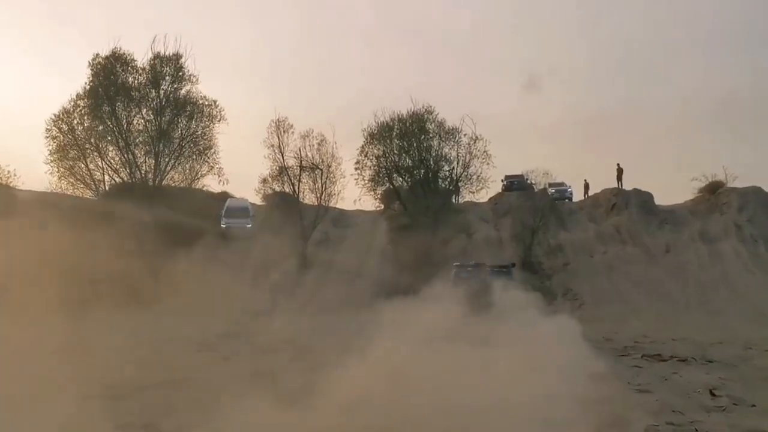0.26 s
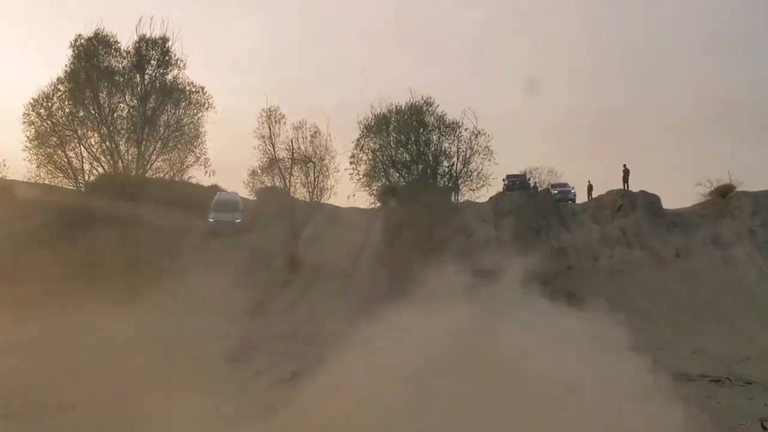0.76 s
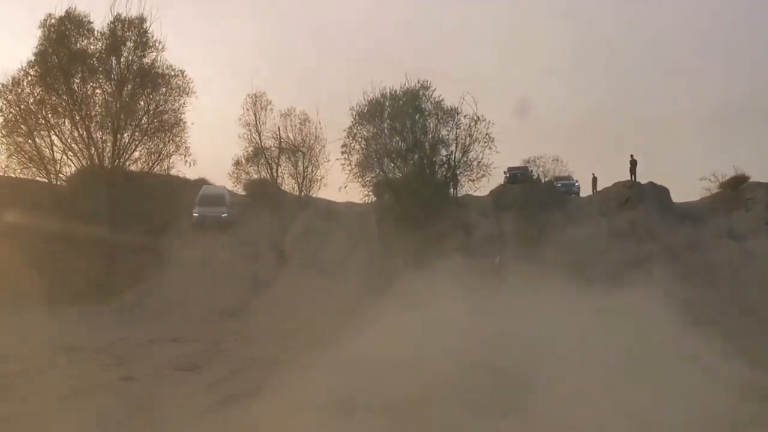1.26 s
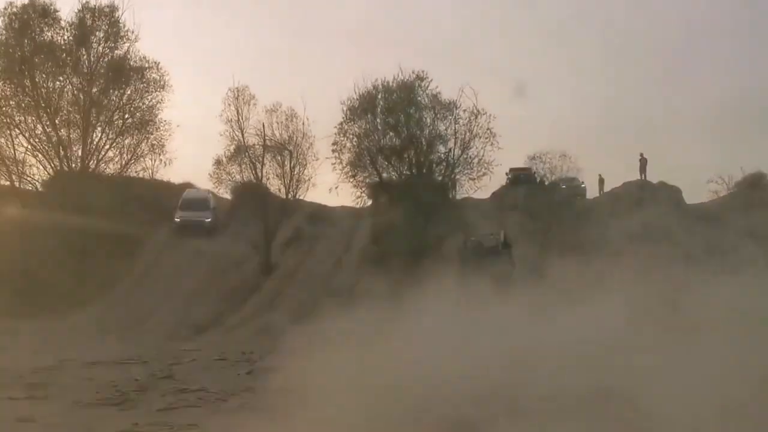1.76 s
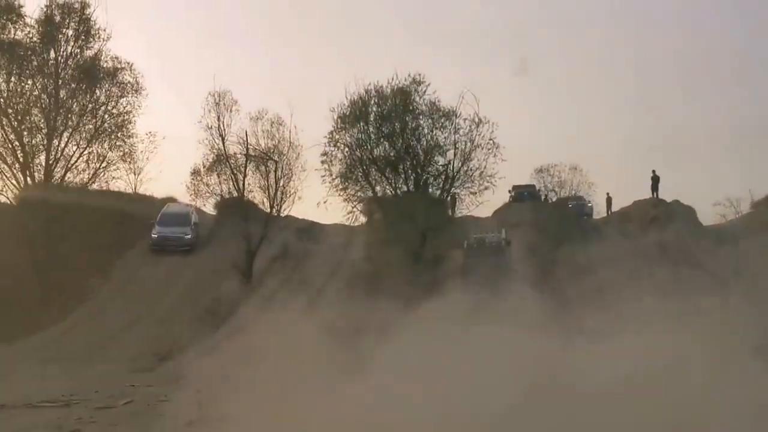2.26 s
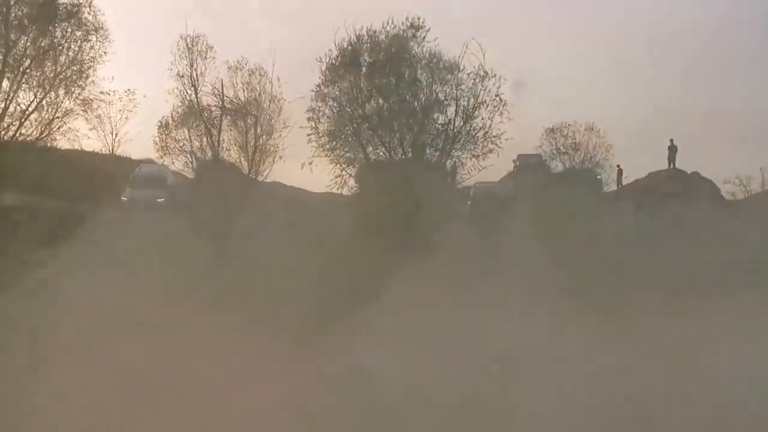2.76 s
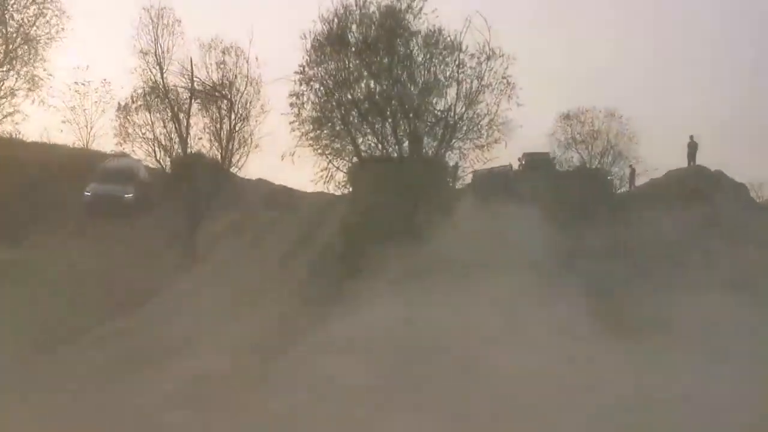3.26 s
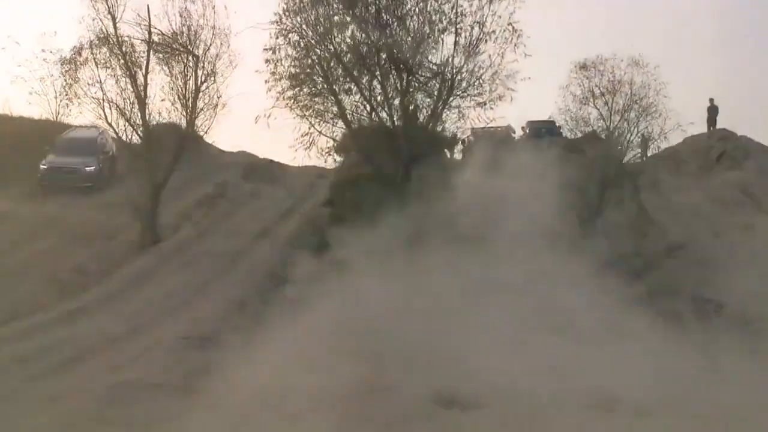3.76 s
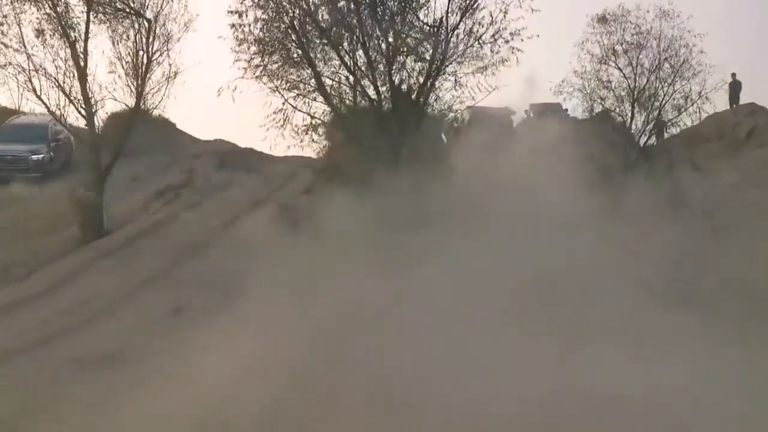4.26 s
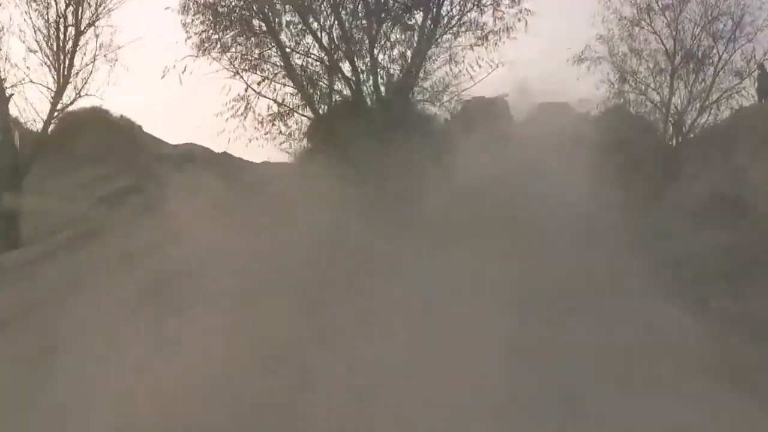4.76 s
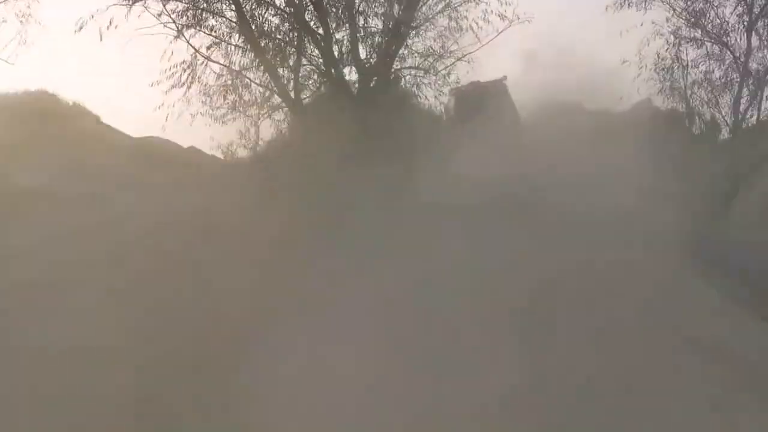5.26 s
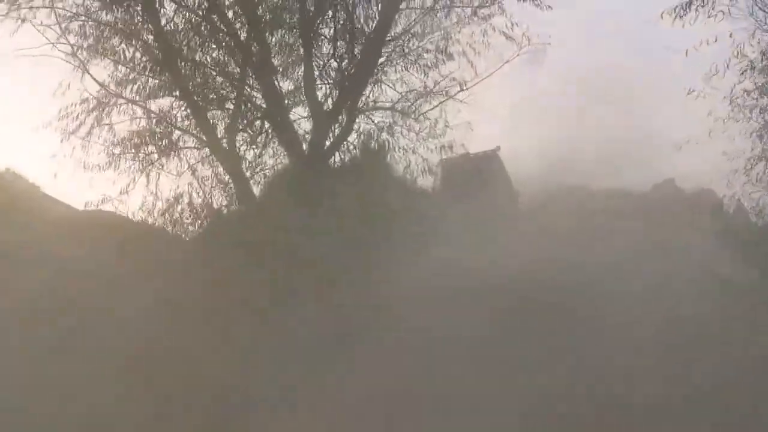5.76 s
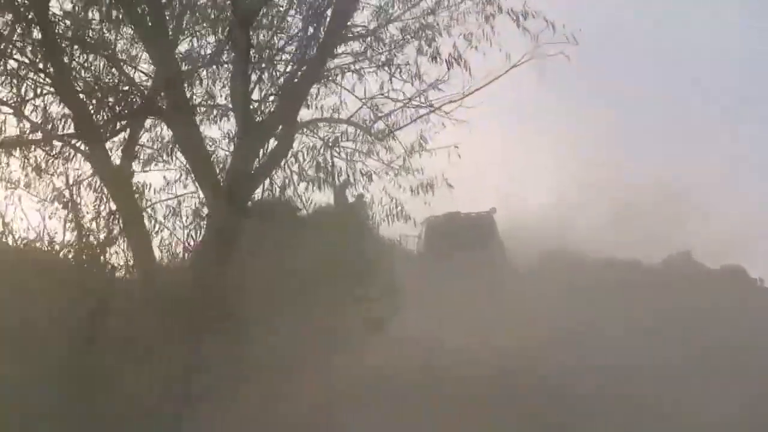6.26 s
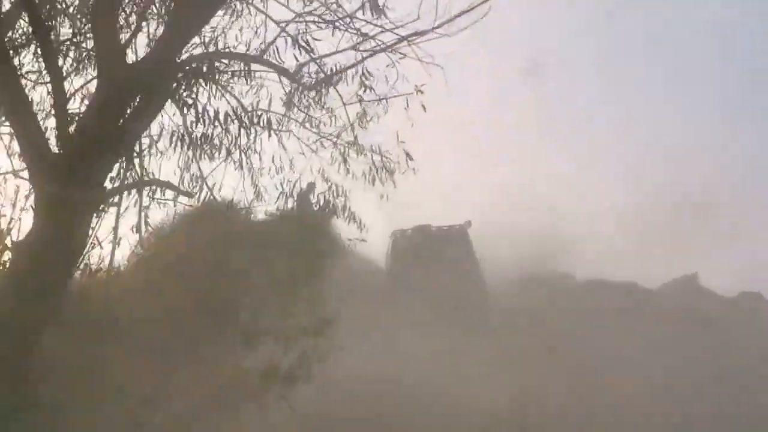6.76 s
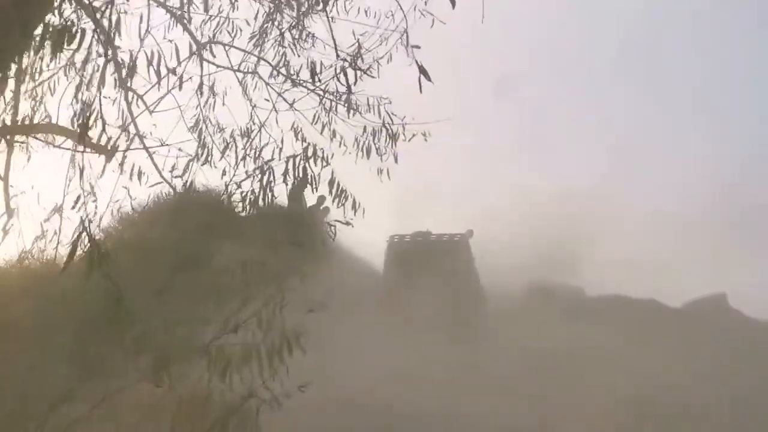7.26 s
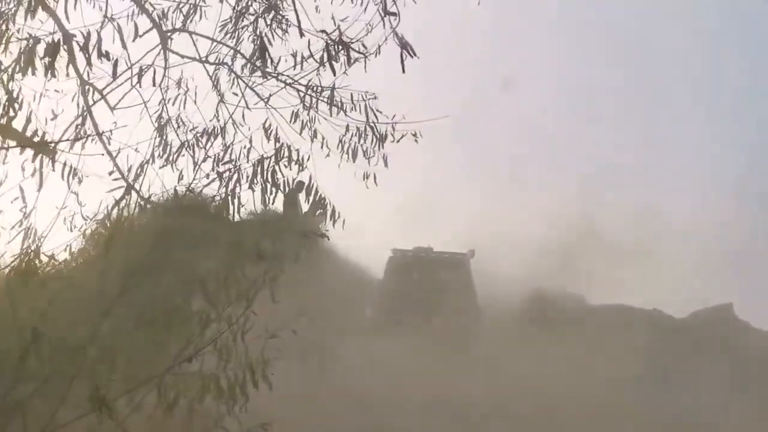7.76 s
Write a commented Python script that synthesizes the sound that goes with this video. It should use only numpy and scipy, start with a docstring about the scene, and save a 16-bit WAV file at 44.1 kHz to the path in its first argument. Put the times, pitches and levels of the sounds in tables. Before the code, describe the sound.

Inside an SUV climbing a rutted sandy track, the engine drones low while body booms, trim rattles and sand hisses, easing off near the crest.

```python
"""An engine drones through a cabin, the body booms over ruts, and trim and loose gear shake on the roughest stretch.
Heard from the front seat of an SUV climbing a sandy track behind another one, on a phone in stereo.
Gravel crunches and sand hisses in surges; near the crest the engine lets off and the car ahead is heard revving.
The engines are swept sines; the body, tyres, sand and gravel are shaped noise driven by forces or grains;
the fittings and loose gear are short noise blows and struck, dying sines."""
import sys
import numpy as np
from scipy import signal
from scipy.fft import rfft, irfft, next_fast_len
from scipy.io import wavfile
from scipy.ndimage import uniform_filter1d, map_coordinates

SR = 44100
rng = np.random.default_rng(int(sys.argv[2]) if len(sys.argv) > 2 else 0)


def bounce(signal):
    """Save signal as a 16-bit WAV file at the path given by the first command-line argument."""
    frames = np.transpose(np.atleast_2d(signal))
    limited = np.clip(frames, -1, 1)
    pcm = np.round(limited * 32767).astype(np.int16)
    wavfile.write(sys.argv[1], SR, pcm)


N = 353241  # samples, about 8 s


def amp(db):
    """Decibels to gain."""
    return 10 ** (np.asarray(db) / 20)


def unit(x):
    """Scale to rms 1."""
    return x / np.sqrt(np.mean(x ** 2) + 1e-20)


def along(points, hz):
    """Read (Hz, value) points at the given frequencies, on a log axis."""
    f, v = np.transpose(points)
    return np.interp(np.log(hz + 1), np.log(f + 1), v)


def curves(rows):
    """One value per sample for each column after the time; the end rows hold outside their times."""
    s, *cols = np.transpose(rows)
    return [np.interp(np.arange(N) / SR, s, c) for c in cols]


def wobble(rate):
    """A smooth random curve, rate knots a second."""
    knots = rng.standard_normal(int(N * rate / SR) + 4)
    return map_coordinates(knots, [np.arange(N) * rate / SR])


def filtered(x, response):
    """Multiply the spectrum of x by a response of frequency."""
    m = next_fast_len(N + SR // 2)
    return irfft(rfft(x, m) * response(np.fft.rfftfreq(m, 1 / SR)), m)[..., :N]


def coloured(x, spectrum):
    """Causal minimum-phase filter of unit energy: only the shape of the spectrum counts."""
    size = 2 ** 14
    log_gain = np.log(amp(along(spectrum, np.fft.rfftfreq(size, 1 / SR))))
    cepstrum = irfft(log_gain)
    # doubling the causal half of the cepstrum gives minimum phase
    response = irfft(np.exp(rfft(2 * cepstrum[:size // 2], size)))
    return signal.fftconvolve(x, response[None] / np.linalg.norm(response), axes=1)[:, :N]


# Likeness of the left and right microphone ports.
# columns: pitch_hz, likeness (1 same, 0 unrelated, negative opposed)
ALIKE = [(50, 1), (250, 0.97), (500, 1), (1000, 0.85), (2000, 0.77), (4000, -.15), (8000, 0.03)]


def spread(pair, lag_s=.00004):
    """Two unrelated signals to left and right: bass alike, treble diffuse, the left port slightly late."""
    def turn(hz):
        return np.arccos(np.clip(along(ALIKE, hz), -1, .999)) / 2

    def delays(hz):
        return np.exp(1j * np.pi * lag_s * np.array([-hz, hz]))

    mid, side = filtered(pair, lambda hz: np.array([np.cos(turn(hz)), np.sin(turn(hz))]))
    return filtered(np.array([mid + side, mid - side]), delays)


def shaken(force, spectrum):
    """A part with this spectrum, driven by a rough force of the given strength."""
    return spread(coloured(force * rng.standard_normal((2, N)), spectrum))


def blow(s, db, t60, attack):
    """The strength of one contact: quick rise, exponential fall by 60 dB in t60 seconds."""
    t = np.arange(SR // 2) / SR
    force = np.zeros(N + SR)
    force[round(s * SR):][:len(t)] = amp(db - 60 * t / t60) * (1 - np.exp(-t / attack))
    return force[:N]


def ring(s, db, hz, t60, attack):
    """One struck mode: a sine under the envelope of a blow."""
    return blow(s, db, t60, attack) * np.sin(2 * np.pi * hz * (np.arange(N) / SR - s))


def grains(rate, size_db, life):
    """Strength, rms 1, of random contacts: rate a second, each one's power dying over life seconds."""
    sizes = amp(size_db * np.minimum(rng.exponential(size=N), 3))
    hits = (rng.random(N) < rate / SR) * sizes
    power = signal.lfilter([1], [1, -np.exp(-1 / (life * SR))], hits ** 2)
    return unit(np.sqrt(power))


def swell(s, length, rise, fall):
    """Gain that rises to 1 at s, holds for length and dies away."""
    t = np.arange(N) / SR - s
    return np.exp(-(np.minimum(t, 0) / rise) ** 2 - np.maximum(t - length, 0) / fall)


def resonant(spectrum, modes):
    """A broad spectrum with narrow resonances standing on it."""
    hz = np.geomspace(20, SR / 2, 2000)
    lift = sum(db / (1 + (2 * (hz - centre) / width) ** 2) for centre, width, db in modes)
    return np.transpose([hz, along(spectrum, hz) + lift])


# The engine under throttle. columns: time_s, firing_rate_hz, load_db (before the cabin)
REVS = [(0, 67, -29.5), (.15, 68.56, -35.5), (.33, 72.43, -38), (.55, 75.26, -36.5), (.75, 76.5, -35.5),
        (.92, 82.5, -33.5), (1.1, 80.66, -33.5), (1.27, 74.77, -37.5), (1.41, 68, -36), (1.52, 63.63, -35),
        (1.8, 60.14, -40), (2.05, 63.3, -31.5), (2.27, 67.5, -41), (2.6, 68.16, -39), (3.1, 74.6, -41.5),
        (3.6, 68.4, -61), (4.2, 67.26, -44), (4.5, 71.33, -41), (4.85, 72.1, -38.5), (5.15, 75.75, -44.5),
        (5.5, 76.35, -50), (6.3, 50.66, -55.5), (6.8, 43.8, -49), (7.1, 38.1, -48.5), (7.3, 56.06, -58.5),
        (7.6, 62.5, -47.5), (8, 61.8, -47)]
# How the cabin passes the engine. columns: pitch_hz, level_db
CABIN = [(25, -3), (45, 12.5), (66, 1), (82, 1), (100, -11.5), (130, -8), (150, -6.5), (170, -10.5),
         (188, -16.5), (205, -1.5), (222, -5), (250, -28), (290, -24.5), (330, -22), (378, -20.5),
         (430, -25), (500, -36), (900, -50.5)]
# Roughness of the ground, also felt by the chassis, sand and trim.
# columns: time_s, roughness_db (over plain track)
GROUND = [(0, -5), (.33, -4.5), (.55, -1.5), (1.68, 2.5), (1.82, 2), (2.62, 0.5), (2.78, 5), (2.93, 11.5),
          (2.99, 11.5), (3.03, 10), (3.1, 7.5), (3.15, 14), (3.31, 12.5), (3.39, 10.5), (3.52, 10.5),
          (3.65, 15.5), (3.8, 3), (4.52, -1.5), (4.72, -2), (5.25, 3), (5.6, 1), (6.75, -2.5), (7.1, -1),
          (8, -4.5)]


def engine(half_db=-18, rough_db=1.8, jitter=0.0022, blur=0.06, flutter_db=1.3):
    """Firing harmonics sweep cabin resonances; unequal cylinders add weak half orders; rough ground flutters them."""
    hz, load_db = curves(REVS)
    rough, = curves(GROUND)
    shake = np.minimum(amp(rough), 1.5)
    phase = 2 * np.pi * np.cumsum(hz * (1 + jitter * shake * wobble(25))) / SR
    drone = np.zeros(N)
    for k in np.arange(2, 17) / 2:  # orders 1 to 8 of the firing rate, in halves
        level_db = along(CABIN, k * hz) + half_db * (k % 1 > 0) + rough_db * shake * wobble(13)
        # uneven firing smears the high orders most
        scatter = blur * k * shake * wobble(40) + 2 * np.pi * rng.random()
        drone += amp(level_db) * np.sin(k * phase + scatter)
    return np.sqrt(2) * amp(load_db + flutter_db * shake * wobble(45)) * drone


# The car ahead, faint and steady until the first row.
# columns: time_s, firing_rate_hz, level_db (mean, of the lower tone)
AHEAD = [(6, 150, -57), (6.35, 161, -46), (6.6, 180, -52), (6.8, 186, -44), (7.05, 200, -50),
         (7.3, 222, -65), (7.6, 230, -55), (8, 246, -55)]


def car_ahead(second_db=-13, rough_db=2):
    """Only the two lowest exhaust tones of the leading car come through the glass."""
    hz, db = curves(AHEAD)
    phase = 2 * np.pi * np.cumsum(hz * (1 + 0.00636 * wobble(12))) / SR
    tones = np.sin(phase) + amp(second_db) * np.sin(2 * phase)
    return np.sqrt(2) * amp(db + rough_db * wobble(41)) * tones


# The climb swells and eases off at the crest.
# columns: time_s, sway_db (relative), tyre_roar_db (on plain track)
CLIMB = [(0, -32, -41.5), (.9, -28.5, -45), (1.5, -24.5, -50.5), (2.75, -18.5, -44.5), (3.6, -15, -52),
         (4.1, -18, -45.5), (5.9, -24.5, -49), (6.55, -37, -48), (7.1, -46, -48), (7.3, -55, -51),
         (8, -39, -51.5)]
# The body heaves through ruts. columns: deepest_s, boom_db, spring_thud_db (both relative)
RUTS = [(.22, -34, -42), (.76, -22, -50), (1.11, -18, -35.5), (1.33, -21, -57), (1.53, -14.5, -34),
        (1.72, -13, -38.5), (1.979, -18.5, -39.5), (2.16, -16, -35), (2.31, -13, -37.5), (2.52, -21, -29),
        (2.63, -14.5, -31), (2.87, -11, -23), (3.06, -13, -48), (3.3, -7.5, -27), (3.549, -12.5, -27.5),
        (3.68, -6.5, -30.5), (3.86, -13, -41), (4.42, -10, -60), (4.661, -14.5, -64), (5.121, -17, -50),
        (5.259, -16.5, -39), (5.52, -17.5, -50), (5.78, -19, -39.5), (6.079, -21, -61), (6.28, -26.5, -59),
        (6.83, -35, -41), (7.54, -32.5, -64)]
RUT_RISE_S, RUT_FALL_S = 0.09, 0.081  # the heave builds up and dies away
# Spectra of the body panels, springs and tyres. columns: pitch_hz, level_db (per Hz, relative)
BOOM = [(8, -28.5), (16, -13), (24, 8.5), (34, -9.5), (47, -4), (60, -20), (80, -25), (110, -27),
        (200, -55.5), (400, -120)]
THUD = [(40, -26), (70, -3.5), (112, 3.5), (165, -0.5), (230, -15.5), (320, -23.5), (700, -61)]
ROAR = [(120, -17.5), (220, 3.5), (320, -1.5), (480, -5), (620, -11), (900, -16), (1400, -22.5),
        (3000, -52.5), (8000, -67)]
THUD_GROWS, ROAR_GROWS = 0.77, 1.046  # dB for each dB of ground roughness


def chassis(boom_db=-1, patter_db=-44, thud_db=-2, steady=0.05, heave_s=0.018):
    """Ruts pump the body panels and thud through the springs; rough ground patters and roars in the tyres."""
    sway_db, tyre_db = curves(CLIMB)
    rough, = curves(GROUND)
    shapes = np.array([swell(s, heave_s, RUT_RISE_S, RUT_FALL_S) for s, _, _ in RUTS])
    heave, thud = np.sqrt(amp(np.transpose(RUTS)[1:]) ** 2 @ shapes ** 2)  # ruts add in power
    sway = shaken(np.ones(N), BOOM)
    power = uniform_filter1d(sway[0] ** 2, size=SR // 14)
    sway = sway / np.sqrt(abs(power) + steady)  # the panels swing steadily, the ruts set how far
    boom = amp(boom_db) * np.hypot(amp(sway_db), heave) * sway
    patter = amp(patter_db + tyre_db - tyre_db.mean() + THUD_GROWS * rough + 2.0 * wobble(7.0))
    springs = shaken(np.hypot(patter, amp(thud_db) * thud), THUD)
    rolling = amp(tyre_db + ROAR_GROWS * rough)
    tyres = shaken(rolling * grains(rate=150, size_db=3.0, life=0.017), ROAR)
    return boom + springs + tyres


# Surges of sand against the body. columns: start_s, length_s, hiss_db, drumming_db (both relative)
SURGES = [(0.397, .04, -61.5, -62), (0.47, 0.047, -54, -51.5), (0.646, 0.19, -53, -53.5),
          (1.467, 0.036, -65, -53), (2.488, 0.014, -58.5, -52.5), (4.012, 0.056, -56, -51),
          (4.509, 0.03, -82, -66), (5.08, 0.18, -57.5, -59), (5.527, 0.25, -81, -62),
          (5.79, 0.28, -52, -58), (6.39, 0.13, -64, -64), (6.903, 0.054, -52, -56),
          (7.126, 0.11, -52.5, -57), (7.297, 0.17, -48.5, -73)]
SURGE_RISE_S, SURGE_FALL_S = 0.057, 0.09


def surges():
    """Strength of the hiss and of the drumming on the panels as sand is thrown; surges add in power."""
    shapes = np.array([swell(s, length, SURGE_RISE_S, SURGE_FALL_S) for s, length, _, _ in SURGES])
    return np.sqrt(amp(np.transpose(SURGES)[2:]) ** 2 @ shapes ** 2)


# Spectrum of sand on the body. columns: pitch_hz, level_db (per Hz, relative)
SAND = [(880, -17), (1500, -21.5), (2200, -8), (2970, -5.5), (3210, -5.5), (3720, -4.5), (6190, -3),
        (7230, -0.5), (7670, -1), (8290, -8), (10700, -20), (14500, -23.5), (15500, -41)]
SAND_GROWS = 0.91  # dB for each dB of ground roughness


def sand(spray_db=2, trickle_db=-66, grit_db=-68):
    """Thrown sand strikes as a dense stream: a trickle that grows on rough ground, surges, and ticks of grit."""
    rough, = curves(GROUND)
    thrown = amp(SAND_GROWS * rough + wobble(8.6))
    hiss, _ = surges()
    stream = np.hypot(amp(trickle_db) * thrown, hiss) * grains(rate=3000, size_db=2, life=.002)
    grit = amp(grit_db) * thrown * grains(rate=18, size_db=2, life=0.023)
    return shaken(amp(spray_db) * np.hypot(stream, grit), SAND)


# Trim panels that rattle. columns: start_s, level_db (relative), pitch_hz
RATTLES = [(0.57, -35, 2160), (2.01, -38, 1740), (2.683, -22, 1440), (2.726, -25, 1445),
           (2.758, -22.5, 1670), (2.799, -27, 1450), (2.83, -34, 1500), (2.851, -29, 2416),
           (2.925, -16.5, 1466), (2.971, -22.5, 1510), (3.048, -25, 1250), (3.175, -22, 2007),
           (3.224, -22.5, 2480), (3.273, -26, 2420), (3.314, -28.5, 1300), (3.366, -31.5, 3530),
           (3.444, -17, 1318), (3.577, -41, 1466), (3.625, -16, 1440), (4.812, -39, 1437),
           (5.15, -38, 2780), (5.302, -32.5, 1494), (5.334, -36, 2700), (5.484, -44, 1498),
           (5.602, -51, 1100), (5.641, -38, 1480), (6.658, -46, 1440), (6.903, -35, 2807)]
# Spectrum of the chatter. columns: pitch_hz, level_db (per Hz, relative)
CHATTER = [(400, -9.5), (800, 1.5), (1150, 1), (1480, 0.5), (1900, 1), (2400, -5.5), (3200, -3),
           (5000, -13.5), (8000, -20.5), (15000, -72.5)]
# Resonances of the panels. columns: pitch_hz, width_hz, lift_db
PANELS = [(1487, 176, 4.8), (1750, 68, 0.87), (2456, 320, 5.3), (3800, 110, 5)]
CHATTER_GROWS = 0.98  # dB for each dB of ground roughness


def trim(chatter_db=-60.0, sand_db=-1, rattle_db=-12.5, rattle_t60=0.11, ring_db=-12.0, ring_t60=0.073, buzz=0.9):
    """Panels chatter with the ground and under the sand; single rattles stand out, buzzing at their own pitch."""
    rough, = curves(GROUND)
    _, drumming = surges()
    drive = np.hypot(amp(chatter_db + CHATTER_GROWS * rough), amp(sand_db) * drumming)
    small = drive * grains(rate=320, size_db=5, life=0.01)
    large = sum(blow(s, db + rattle_db, rattle_t60, attack=0.0029) for s, db, _ in RATTLES)
    t = np.arange(N) / SR
    flutter = buzz * wobble(500)  # radians
    rings = sum(blow(s, db + ring_db, ring_t60, attack=.001) * np.sin(2 * np.pi * hz * t + flutter)
                for s, db, hz in RATTLES)
    return shaken(np.hypot(small, large), resonant(CHATTER, PANELS)) + rings


# The tyres crunch over clods and gravel. columns: start_s, length_s, level_db
CRUNCHES = [(.757, 0.014, -46.5), (.875, 0.0078, -42.5), (1.088, 0.023, -48), (1.16, 0.014, -49.5),
            (1.198, 0.02, -48), (1.43, 0.036, -54), (1.512, .015, -50), (1.635, .06, -49.5),
            (1.92, .04, -56), (2.912, 0.015, -35), (3.58, 0.037, -44), (3.665, .04, -43),
            (4.32, 0.013, -59.5), (4.362, 0.015, -54), (4.435, .03, -51.5), (4.535, 0.028, -55),
            (4.82, .06, -52), (4.955, 0.023, -52.5), (5.2, 0.039, -51.5), (5.305, 0.0088, -47),
            (5.63, 0.014, -51.5)]
# Coarse grit scuffs along the body. columns: start_s, length_s, level_db
SCUFFS = [(7.19, 0.042, -58.5), (7.385, .04, -48.5), (7.635, 0.077, -58.5), (7.731, 0.016, -53.5)]
# Spectra of crunch and scuff. columns: pitch_hz, level_db (per Hz, relative)
CRUNCH = [(200, -34.5), (450, 1), (700, 4), (1100, -1), (1600, -5), (2400, -12), (3400, -15.5),
          (5000, -26.5), (9000, -44)]
SCUFF = [(800, -25), (1500, -1.5), (2500, 3.5), (3200, 4.5), (4300, 1), (5500, -3), (7500, -6),
         (10000, -25.5)]


def gravel(rise_s=.008, fall_s=.013):
    """Short, coarse bursts that stop abruptly: gravel crushed under the tyres, grit dragged along the body."""
    def bursts(rows):
        return np.sqrt(sum((amp(db) * swell(s, length, rise_s, fall_s)) ** 2 for s, length, db in rows))

    crunch = bursts(CRUNCHES) * grains(rate=540, size_db=2.5, life=0.0034)
    scuff = bursts(SCUFFS) * grains(rate=600, size_db=3, life=.0012)
    return shaken(crunch, CRUNCH) + shaken(scuff, SCUFF)


# The underbody ploughs through heaped sand. columns: start_s, length_s, level_db
PLOUGHS = [(.84, 0.035, -41.5), (2.86, 0.11, -36), (3.125, .06, -33.5), (3.24, 0.089, -31)]
# Spectrum of the groan. columns: pitch_hz, level_db (per Hz, relative)
UNDERBODY = [(90, -18), (170, -1.5), (240, 2), (350, -1.5), (480, -6), (700, -14), (1500, -60)]


def ploughing(rise_s=0.014, fall_s=0.028):
    """The underbody grinds through heaped sand and groans: low noise made of coarse grains."""
    push = sum(amp(db) * swell(s, length, rise_s, fall_s) for s, length, db in PLOUGHS)
    return shaken(push * grains(rate=220, size_db=2.5, life=0.008), UNDERBODY)


# Dry cracks where panels slap together. columns: start_s, level_db (relative)
CRACKS = [(.874, -35), (1.628, -36), (2.8, -29), (2.83, -31), (2.924, -21), (3.576, -31), (3.627, -22),
          (4.249, -38), (4.534, -40), (4.966, -39), (5.642, -33), (6.902, -29), (6.904, -25), (6.949, -36)]
# Spectrum of a crack. columns: pitch_hz, level_db (per Hz, relative)
CRACK = [(200, -20), (500, -2), (1450, 0), (2100, -3), (2900, 0), (3700, -2), (5000, -8), (8000, -20),
         (12000, -42)]


def cracks(crack_db=-3, t60=.022, attack=.0004):
    """A panel slaps its neighbour and stops dead."""
    slaps = sum(blow(s, db + crack_db, t60, attack) for s, db in CRACKS)
    return shaken(slaps, CRACK)


# Hollow knocks in the cabin. columns: start_s, level_db (relative), pitch_hz
KNOCKS = [(0.875, -23, 402), (.897, -31, 430), (1.099, -38, 522.6), (1.628, -33, 470), (2.975, -21, 560),
          (3.122, -19, 340), (3.16, -16, 232), (3.243, -21, 540), (3.437, -16, 483), (3.456, -20, 500),
          (3.625, -20, 310), (5.307, -31.5, 475.5), (6.335, -26, 345), (6.535, -36, 490),
          (6.662, -18.5, 330), (6.89, -27, 560), (6.902, -16, 385.8), (6.908, -19, 530), (6.951, -24, 420),
          (6.975, -28, 500), (7.155, -32, 360)]
# The suspension takes bumps. columns: start_s, level_db (relative), pitch_hz
JOLTS = [(1.165, -19.5, 122), (1.658, -31, 124), (1.93, -20.5, 115), (2.502, -15, 83.94),
         (2.776, -16, 131.5), (2.862, -14, 142), (2.904, -15.5, 201), (2.962, -11, 165),
         (2.999, -20, 120.8), (3.15, -17.5, 216), (3.214, -11, 111), (3.3, -5.5, 104), (3.458, -16, 124),
         (3.606, -17, 102.9), (4.362, -13, 115)]
# A loose metal piece clinks. columns: start_s, level_db (relative), pitch_hz
CLINKS = [(2.011, -38, 1710), (3.05, -29, 2455), (3.4396, -20.5, 2320)]
# Spectra of knock and jolt. columns: pitch_hz, level_db (per Hz, relative)
KNOCK = [(60, -21), (160, 3), (250, -2.5), (370, 8), (530, -7), (760, -17.5), (1250, -30), (2800, -33),
         (5000, -32.5), (9000, -51.5)]
JOLT = [(30, -39.5), (60, 17), (112, 5), (150, 2.5), (215, -2), (280, -8), (500, -23), (1200, -61.5)]


def loose_gear(clink_db=-3, knock_db=-4.0, hollow_db=-7, jolt_db=-9, bounce_db=-1):
    """Metal clinks, hollow knocks, and jolts of the suspension that each shudder and bounce at a low pitch."""
    clinks = sum(ring(s, db + clink_db, hz, t60=0.059, attack=0.00049) for s, db, hz in CLINKS)
    knocks = sum(blow(s, db + knock_db, t60=0.041, attack=0.0031) for s, db, _ in KNOCKS)
    hollow = sum(ring(s, db + hollow_db, hz, t60=0.059, attack=0.001) for s, db, hz in KNOCKS)
    jolts = sum(blow(s, db + jolt_db, t60=0.24, attack=0.0036) for s, db, _ in JOLTS)
    bounces = sum(ring(s, db + bounce_db, hz, t60=0.12, attack=0.0036) for s, db, hz in JOLTS)
    return clinks + hollow + bounces + shaken(knocks, KNOCK) + shaken(jolts, JOLT)


# Hard plastic snaps and ticks, played by fittings and snap_rings.
# columns: start_s, level_db (relative), lower_clack_db (relative to the snap), pitch_hz
SNAPS = [(1.626, -43, -10, 7300), (2.01, -27, -6, 4630), (2.024, -33, -5, 4630), (2.68, -22, -18, 6160),
         (2.924, -32, -8, 3940), (3.409, -15, -18, 7450), (3.437, -22, -14, 7320), (3.459, -20, -13, 6590),
         (3.623, -28, -8, 3140), (3.682, -29, -16, 7450), (3.738, -38, -10, 4310), (4.115, -30, -10, 7210),
         (4.16, -32, -10, 7240), (4.616, -43, -4, 3450), (4.658, -42, -9, 3550), (4.862, -45, -10, 3550),
         (4.905, -45, -10, 6830), (5.036, -38, -4, 4200), (5.059, -42, -5, 4350), (5.194, -36, -10, 7190),
         (5.434, -42, -12, 7430), (5.736, -20, -10, 5730), (5.75, -29, -9, 5730), (6.69, -22, -30, 6760),
         (7.017, -39, -18, 5150)]
# Spectra of the snap, its lower clack and its bright edge. columns: pitch_hz, level_db (per Hz, relative)
SNAP = [(300, -37.5), (2000, -33.5), (3400, 0.5), (4400, 0.5), (5200, 2.5), (6400, 3.5), (7400, 2.5),
        (8200, -3.5), (9500, -18.5), (15000, -42.5)]
CLACK = [(300, -46.5), (1600, -30), (2500, 19), (3400, 16.5), (4500, -33), (7000, -45.5), (15000, -51)]
EDGE = [(3000, -39), (7000, -12), (9000, 5), (11000, -6.5), (15000, -10.5)]
# Resonances of the plastic fittings. columns: pitch_hz, width_hz, lift_db
PLASTIC = [(2650, 150, 5), (3830, 130, 3), (4600, 160, 6), (5820, 170, 4), (6700, 400, 5), (7320, 140, 2)]


def fittings(snap_db=-9, clack_db=-10, crack_db=5, cabin_t60=0.09, edge_db=-21, edge_grows=1.8):
    """Plastic snaps: a hard crack, then a short ring in the cabin; the harder the snap, the brighter its edge."""
    def strike(s, db):
        crack = blow(s, db + crack_db, t60=0.006, attack=0.0003)
        return crack + blow(s, db, cabin_t60, attack=0.00071)

    hardest = max(db for _, db, _, _ in SNAPS)
    snaps = sum(strike(s, db + snap_db) for s, db, _, _ in SNAPS)
    clacks = sum(strike(s, db + lower + clack_db) for s, db, lower, _ in SNAPS)
    edges = sum(strike(s, hardest + edge_db + edge_grows * (db - hardest)) for s, db, _, _ in SNAPS)
    plastic = shaken(snaps, resonant(SNAP, PLASTIC)) + shaken(clacks, resonant(CLACK, PLASTIC))
    return plastic + shaken(edges, EDGE)


def snap_rings(ring_db=-14, ring_t60=.1, buzz=.8):
    """Each plastic part rings briefly at its own pitch, buzzing against its seat."""
    t = np.arange(N) / SR
    # two unrelated phase flutters, in radians, make the pair to spread
    flutter = buzz * np.array([wobble(900), wobble(680)]) + 2 * np.pi * rng.random((2, 1))
    rings = sum(blow(s, db + ring_db, ring_t60, attack=.0005) * np.sin(2 * np.pi * hz * t + flutter)
                for s, db, _, hz in SNAPS)
    return spread(rings)


def scene():
    """Everything as heard from the front seat; the rattles sit a little to the right, the chassis barely so."""
    rattles = trim() + fittings() + snap_rings() + cracks() + loose_gear() + sand() + gravel()
    rattles = rattles * amp([[-.6], [.6]])  # dB left, right
    body = chassis() * amp([[-.15], [.15]])
    return engine() + car_ahead() + ploughing() + body + rattles


TOP_HZ = 15150  # band limit of the phone


def record(dry):
    """The phone opens and closes softly and keeps nothing above its band limit."""
    edges = signal.windows.tukey(N, .001)
    return filtered(dry * edges, lambda hz: hz < TOP_HZ)


dry = scene()
out = record(dry)
bounce(out)
```